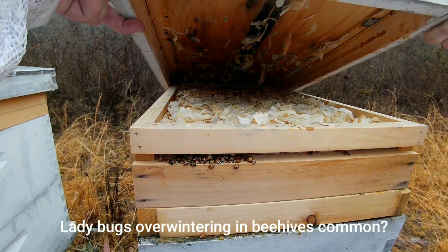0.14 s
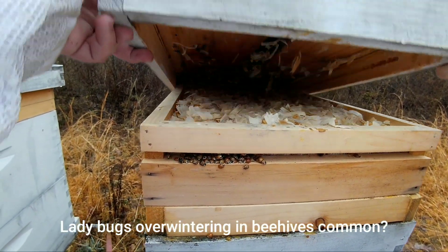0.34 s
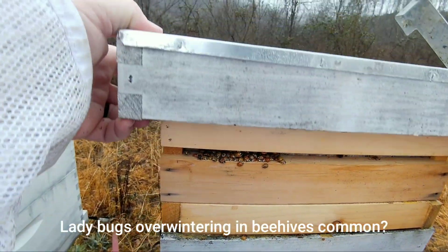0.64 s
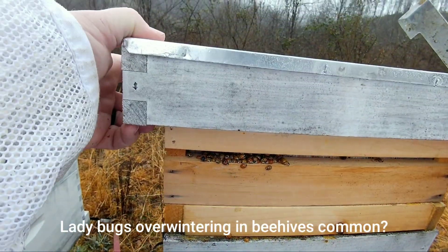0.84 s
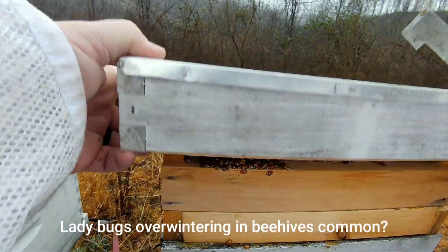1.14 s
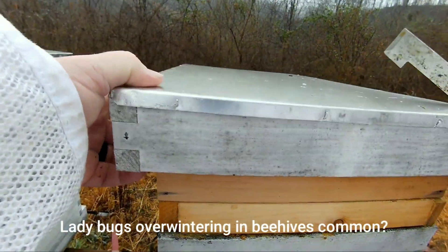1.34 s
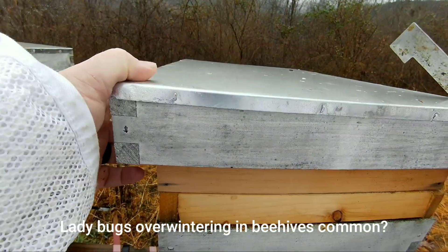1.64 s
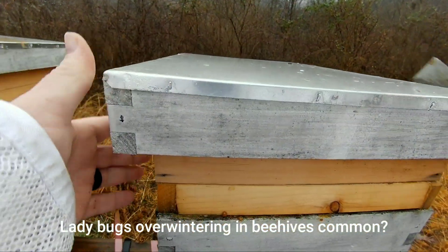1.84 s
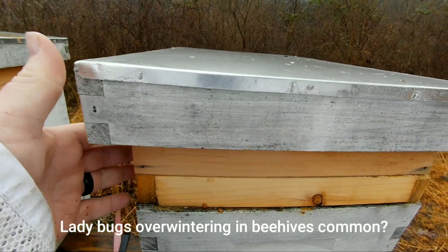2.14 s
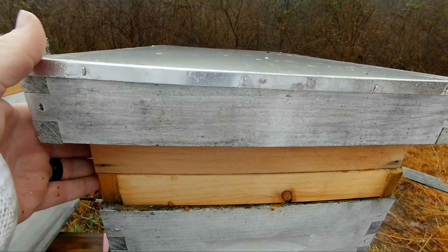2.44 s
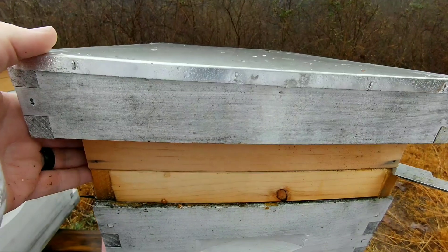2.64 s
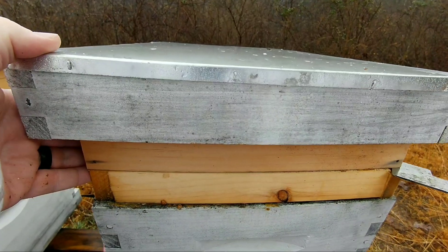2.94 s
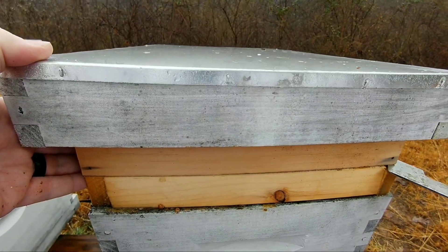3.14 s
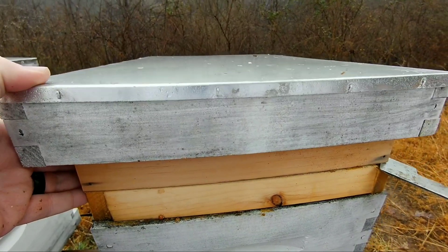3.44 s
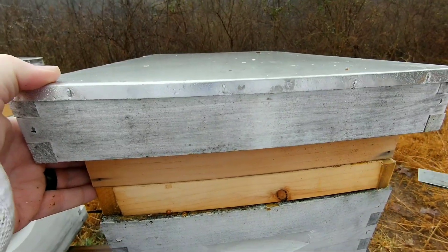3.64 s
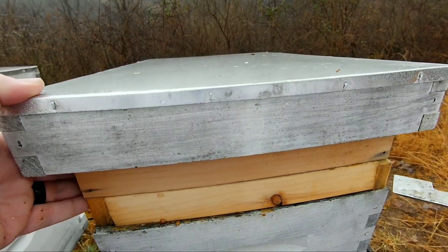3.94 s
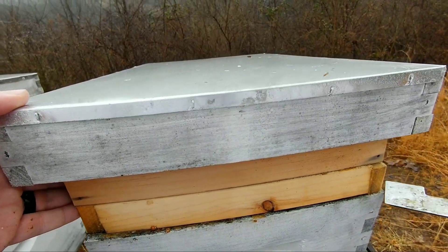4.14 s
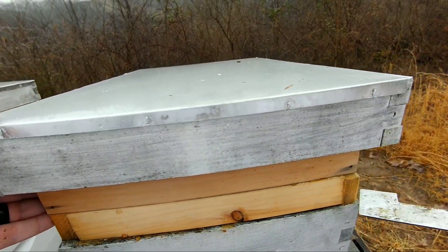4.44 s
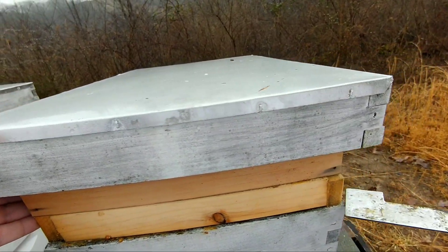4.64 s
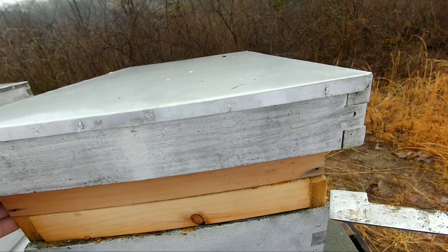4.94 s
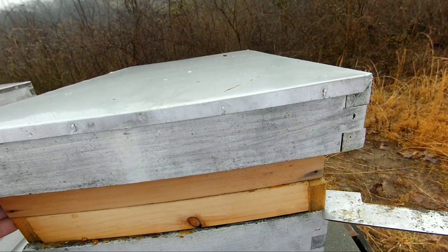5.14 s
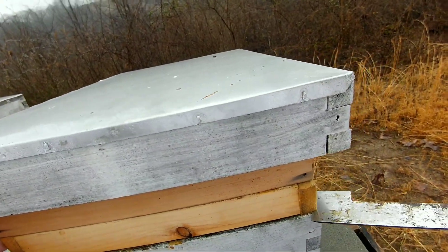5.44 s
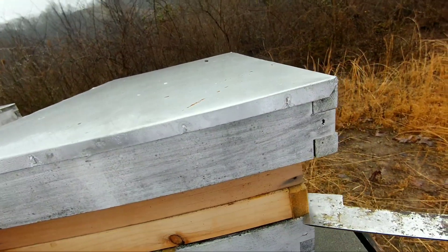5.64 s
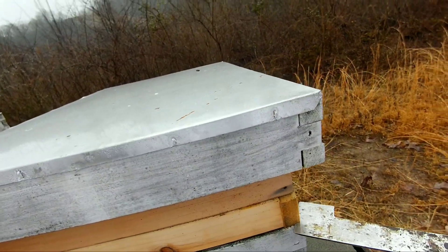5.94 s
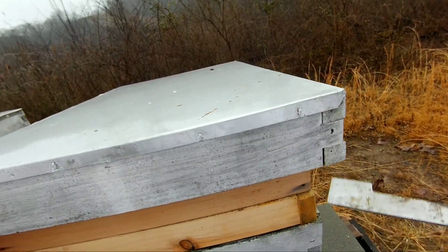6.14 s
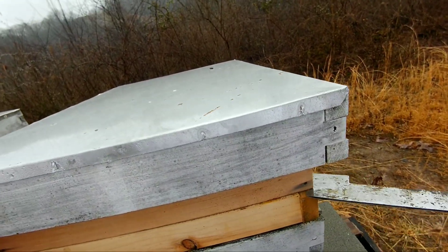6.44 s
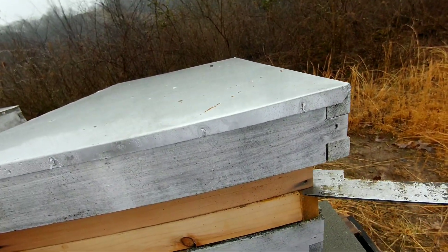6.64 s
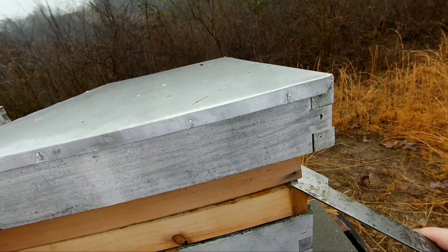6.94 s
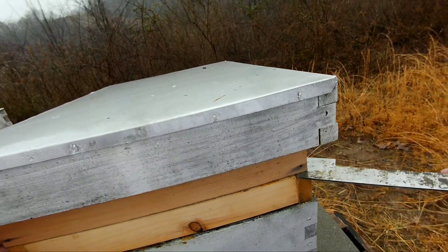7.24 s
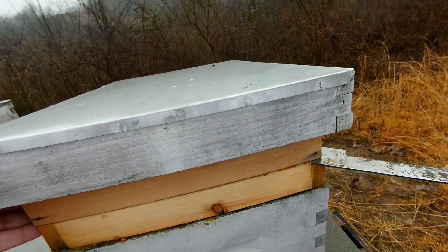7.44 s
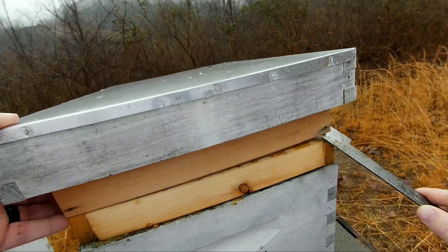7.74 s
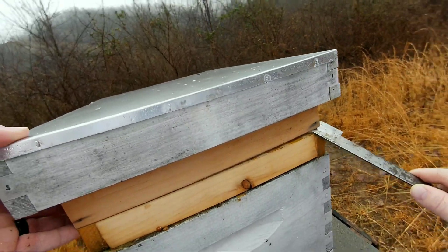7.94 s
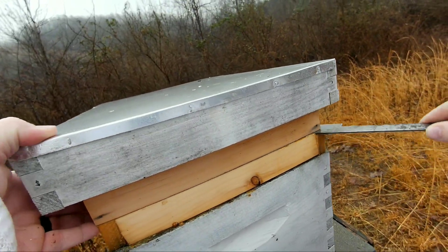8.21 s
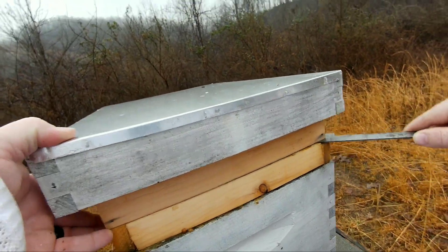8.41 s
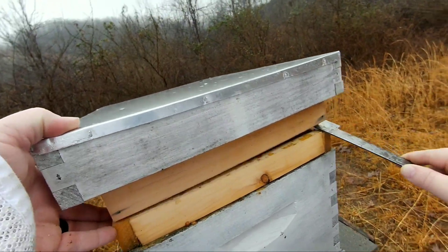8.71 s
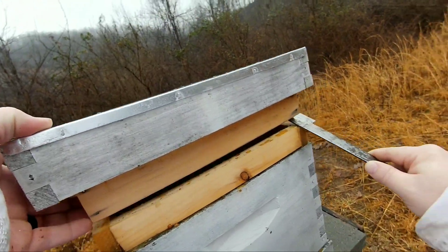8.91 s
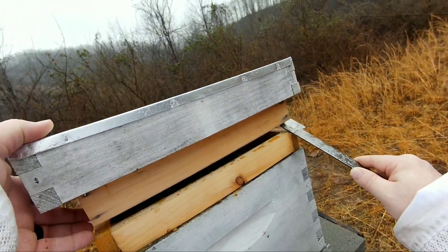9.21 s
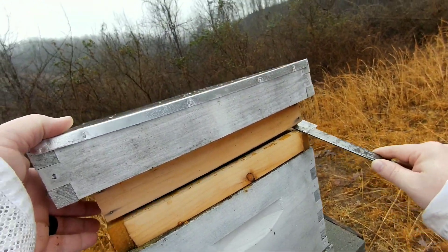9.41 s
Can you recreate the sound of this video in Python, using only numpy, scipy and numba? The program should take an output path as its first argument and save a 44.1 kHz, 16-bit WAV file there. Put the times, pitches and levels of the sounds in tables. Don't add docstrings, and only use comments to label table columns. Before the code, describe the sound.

A close outdoor scene over a quiet bed: a small engine putters low and unevenly far off, around 25 firings a second and slightly quicker after 5 s, with soft damp air and faint tyre roar swelling and fading. From 0 to 0.7 s come tiny gritty ticks and light wood rubbing. The lid settles with dull hollow knocks at 0.7-0.85 s, then a cluster of soft knocks and a tinny clack at 1.2-1.4 s, with fainter taps to 1.75 s. After a tick at 3.1 s, a very loud, clipped tin-and-wood bang strikes at 3.3 s, followed by a slam at 3.4 s, both short and dry. Faint taps occur near 5.1 and 5.9 s. A steel bar touches and bites with a bright clack at 7.0-7.1 s; wood rubs until 7.8 s. At 8.74 s the resin seal cracks sharply, followed by slight rubbing and a soft knock near 9 s. The engine continues to the end.

```python
import sys
import numpy as np
from scipy import signal
from scipy.io import wavfile
from scipy.ndimage import uniform_filter1d
from numba import njit

SR = 44100
rng = np.random.default_rng(int(sys.argv[2]) if len(sys.argv) > 2 else 0)


def bounce(signal):
    frames = np.transpose(np.atleast_2d(signal))
    limited = np.clip(frames, -1, 1)
    pcm = np.round(limited * 32767).astype(np.int16)
    wavfile.write(sys.argv[1], SR, pcm)


N = 422037


def undb(db):
    return 10 ** (np.asarray(db) / 20)


def level(x, db):
    return x * undb(db) / np.sqrt(np.mean(x ** 2))


def curve(rows):
    s, *columns = np.transpose(rows)
    return [np.interp(np.arange(N) / SR, s, c) for c in columns]


@njit
def svf(x, hz, width):
    y, b, l = np.empty(len(x)), 0., 0.
    for i in range(len(x)):
        g, k = np.tan(np.pi * hz[i] / SR), width / hz[i]
        v = (b + g * (x[i] - l)) / (1 + g * (g + k))
        b, l, y[i] = 2 * v - b, l + 2 * g * v, k * v
    return y


def band(x, hz, width):
    return svf(x, np.clip(hz * np.ones(len(x)), 10, .45 * SR), 1. * width)


def resonate(x, modes):
    return sum(undb(db) * band(band(x, hz, width), hz, 1.7 * width) for hz, width, db in modes)


def walk(rate):
    k = int(SR / rate)
    steps = np.repeat(rng.standard_normal(N // k + 1), k)
    return 0.71 * uniform_filter1d(uniform_filter1d(steps, k), k)[:N]


def add(out, s, x, db):
    i = int(s * SR)
    out[i:i + len(x)] += (x * undb(db) / np.abs(x).max())[:N - i]


def ring(modes, luck, stretch):
    t = np.arange(SR // 4) / SR
    hz, db, t60 = (c[:, None] for c in np.transpose(modes))
    a, b = luck[:len(modes), None], luck[::-1][:len(modes), None]
    decay = np.exp(-np.log(1000) * t / (t60 * stretch))
    tones = np.sin(2 * np.pi * hz * (1 + 0.03 * b) * t) * decay
    return np.sum(np.sign(b) * undb(db + 0.4 * a) * tones, axis=0)


# (frequency [Hz], level [dB], t60 [s])
BOX_MODES = [(80, -8, 0.087), (127, -4, 0.027), (186, -6, 0.07), (255, -2.5, 0.059), (332, -0.5, 0.05)]


def blows(table, panel, crack_modes, own_hz, t60, tail):
    out, t = np.zeros(N), np.arange(SR // 4) / SR
    fade = np.exp(-np.log(1000) * t / t60)
    snap = np.exp(-t / .0018) + tail * fade
    push = np.hanning(18)
    thud_modes = BOX_MODES + [(own_hz, 4, .09)] * (own_hz < 1000)
    crack_modes = crack_modes + [(own_hz, 700, 4)] * (own_hz > 1000)
    for s, panel_db, hz, thud_db, crack_db in table:
        s = s + 0.0012
        luck = rng.standard_normal(12)
        rattle_noise, crack_noise = rng.standard_normal((2, len(t)))
        board = ring(panel + [(hz, 2.5, .06)], luck, t60 / 0.062)
        rattle = resonate(rattle_noise * fade, [(hz, 600, 0), (1150, 500, -1), (560, 160, -3)])
        thud = ring(thud_modes, luck, 1.0)
        add(out, s, np.convolve(board, push), panel_db + 1.5)
        add(out, s, rattle, panel_db - 6.5)
        add(out, s, np.convolve(thud, np.hanning(130)), thud_db + 7)
        add(out, s, resonate(crack_noise * snap, crack_modes), crack_db + 7.0)
    return out


# (time [s], panel peak [dB], loudest panel pitch [Hz], box thud [dB], crack [dB])
CLACKS = [
    (1.319, -20.5, 1028, -59, -36),
    (1.325, -23.5, 520, -48, -50),
    (3.305, -1.5, 647, -19, -13),
    (3.323, -25, 533, -30, -37.5),
]
# (frequency [Hz], level [dB], t60 [s])
LID_MODES = [(490, -6.5, 0.055), (681, 0.5, 0.065), (900, -5.5, 0.05), (1107, -16.5, 0.091),
             (1184.3, -7, 0.047), (1370, -9, 0.041), (1599, -23.5, 0.054), (2020, -16, 0.022),
             (2420, -29.5, 0.03)]
# (frequency [Hz], width [Hz], level [dB])
TIN_CRACK = [(2900, 1800, -2), (4600, 1300, 2.5), (6505, 4400, -9)]


def lid_clacks():
    return blows(CLACKS, LID_MODES, TIN_CRACK, own_hz=3300, t60=.034, tail=.1)


# (time [s], peak [dB])
SLAPS = [
    (3.307, 2.5),
    (3.3241, -33.5),
]


def tin_slap():
    out, t = np.zeros(N), np.arange(SR // 100) / SR
    for s, db in SLAPS:
        hiss = resonate(rng.standard_normal(len(t)), [(9300, 1000, 0.0), (11600, 9000, 0.0084)])
        shriek = np.sin(2 * np.pi * 10340 * t) + hiss
        add(out, s, shriek * np.exp(-((t - .001) / 0.0005) ** 2), db)
    return out


# (time [s], panel peak [dB], loudest panel pitch [Hz], box thud [dB], crack [dB])
SLAMS = [
    (0.779, -37.5, 443, -39, -44),
    (0.799, -33, 750, -25, -52),
    (3.39, -6, 676, -18.5, -23.5),
    (3.407, -28, 506, -55, -29.5),
]
# (time [s], panel peak [dB], loudest panel pitch [Hz], box thud [dB])
KNOCKS = [(0.689, -44, 440, -53.5), (0.842, -40, 1090, -38.5), (1.18, -28.5, 687, -59),
          (1.194, -44, 670, -41), (1.238, -27.5, 514, -33.5), (1.246, -39, 500, -27.5),
          (1.356, -40, 533, -44), (1.394, -45, 616, -58.5), (1.563, -39.5, 1300, -55.5),
          (1.7174, -39.5, 900, -53.5), (1.736, -34, 486, -45.5), (5.049, -46, 1290, -54.5),
          (5.197, -45, 647, -56), (5.93, -52, 810, -58), (7.468, -43.5, 1160, -52.5),
          (7.6, -57, 450, -55.5), (8.949, -42.5, 477, -44)]
# (frequency [Hz], level [dB], t60 [s])
BOARD_MODES = [(523, -4.5, 0.061), (886, -1.5, 0.052), (1127, -4.5, 0.042), (1450, -30, 0.025)]
# (frequency [Hz], width [Hz], level [dB])
WOOD_CRACK = [(2048, 1200, -9.5), (3700, 760, 1), (4710, 410, -2)]


def wood_knocks():
    soft = [tuple(row) + (row[1] - 29,) for row in KNOCKS]
    return blows(soft + list(SLAMS), BOARD_MODES, WOOD_CRACK, own_hz=219.8, t60=0.049, tail=0.16)


# (time [s], panel peak [dB], pitch added to the frame modes [Hz], box thud [dB], crack
# [dB])
PRIES = [
    (7.011, -33.5, 925, -42.5, -51),
    (7.029, -38, 810, -39.5, -43),
    (7.093, -17, 1130, -32, -21.5),
]
# (time [s], panel peak [dB], pitch added to the frame modes [Hz], box thud
# [dB], crack [dB])
TEARS = [
    (8.738, -24, 893.5, -36, -33.5),
    (8.743, -20, 547, -31.5, -28.5),
]
# (frequency [Hz], level [dB], t60 [s])
FRAME_MODES = [(334, -9, 0.23), (520, -7, 0.047), (745, 6.5, 0.068), (900, 10, 0.042), (1143, 12, 0.019),
               (1686, 10, .03), (2130, -14.5, .03), (2900, 9, 0.0063)]
# (frequency [Hz], width [Hz], level [dB])
RESIN_CRACK = [(4220, 790, -5), (1800, 660, -2), (8800, 1240, -11.5)]


def steel_bar():
    pries = blows(PRIES, FRAME_MODES, TIN_CRACK, own_hz=2900, t60=0.036, tail=0.99)
    return pries + blows(TEARS, FRAME_MODES[:-1], RESIN_CRACK, own_hz=3800, t60=0.043, tail=0.32)


# (time [s], peak [dB], pitch [Hz])
TICKS = [(0.1145, -52, 3190), (0.13, -58, 2480), (0.3546, -51.5, 2530), (0.388, -58, 2640),
         (0.416, -55.5, 2280), (0.4817, -51.5, 2480), (0.581, -56, 2350), (0.608, -44.5, 3550),
         (0.641, -57, 2900), (0.7532, -38.5, 3700), (3.0696, -36, 4300), (3.1728, -53, 4830),
         (6.9786, -39.5, 4300), (7.0019, -43, 5290), (7.7104, -67, 2420), (7.742, -46, 3580),
         (7.7805, -53.5, 2570), (8.6906, -37, 4280), (8.996, -47, 3480)]


def ticks():
    out, t = np.zeros(N), np.arange(SR // 20) / SR
    for s, db, hz in TICKS:
        puff = rng.standard_normal(len(t)) * np.exp(-t / .0028)
        body = resonate(puff, [(hz, 0.28 * hz, 0), (1700, 1400, -1), (800, 600, -4), (2800, 3000, -4)])
        sizzle_db = -14.5 + 11 * max(hz - 3800, 0) / 1000
        add(out, s, body, db + 2.0)
        add(out, s, resonate(puff, [(6770, 6700, 0)]), db + sizzle_db)
    return out


# (start [s], end [s], level [dB], centre [Hz], width [Hz])
RUB = [(0.071, 0.246, -65, 2820, 900), (0.51, 0.803, -68, 2600, 1200), (0.69, 0.79, -59, 900, 900),
       (1.142, 1.282, -50, 1003, 805), (1.693, 1.757, -58, 600, 500), (6.996, 7.078, -60, 900, 900),
       (7.33, 7.577, -59.5, 1180, 500), (7.54, 7.647, -65, 1500, 500), (7.683, 7.839, -56, 1460, 590),
       (7.725, 7.826, -66.5, 3700, 2470), (8.337, 8.526, -71.5, 4250, 1200), (8.868, 9.04, -64, 1272, 821)]


def rubbing():
    out = np.zeros(N)
    grain_db = 2.5 * rng.exponential(size=N) + 2.5 * walk(90)
    grains = level(rng.standard_normal(N) * undb(grain_db), 0)
    for start, end, db, hz, width in RUB:
        i, k = int(start * SR), int(end * SR)
        scrape = level(resonate(grains[i:k], [(hz, width, 0)]), db)
        out[i:k] += np.hanning(k - i) ** 0.5 * scrape
    return out


def yard_echo(near):
    t = np.arange(SR // 5) / SR
    yard = band(rng.standard_normal(len(t)), 400, 700) * np.exp(-np.log(1000) * t / 0.071) * (t > .006)
    return signal.fftconvolve(near, yard / np.sqrt(np.sum(yard ** 2)))[:N]


def pipe(pulses, tuning, modes, sign=1, wide=3.0):
    out = 0
    for k, (hz, width, db) in enumerate(modes):
        tone = band(band(pulses, hz * tuning, width), hz * tuning, wide * width)
        out = out + sign ** k * undb(db) * level(tone, 0)
    return out


# (time [s], firing rate [Hz], exhaust bark [dB], load [dB])
ENGINE = [(0, 23.2, -43.5, 3), (.32, 23.52, -44, -1), (.98, 25.16, -44.5, 1.5), (1.28, 26.92, -43, 0.5),
          (1.76, 26.5, -44, 1.5), (2.11, 26.69, -44.5, 4), (2.25, 26.57, -46.5, 5.5),
          (2.5, 26.31, -48, 2.5), (3.17, 26.33, -42.5, 0), (3.62, 26.36, -43, -2), (4.3, 26.54, -41.5, -1),
          (5.6, 28.64, -45, -2.5), (6.05, 29.84, -43, -2.5), (6.7, 29.45, -44.5, -2),
          (7.68, 28.6, -45.5, -3), (8.13, 28.78, -43, -2), (8.75, 28.81, -45, -0.5),
          (9.57, 26.78, -43.5, -2)]
# (frequency [Hz], width [Hz], level [dB])
BOOM = [(27.7, 13, -5), (53.4, 20, 2.5), (76, 81, -4), (105.5, 5.2, -10.5)]
# (frequency [Hz], width [Hz], level [dB])
BARK = [(152.4, 27, 3), (178, 51, -13)]
# (frequency [Hz], width [Hz], level [dB])
RASP = [(244, 43, 8), (390, 120, -3)]


def engine():
    hz, bark_db, load_db = curve(ENGINE)
    faster = hz - 26.5
    tuning = 0.92 + 0.016 * faster
    unsteady = 1 + 0.0023 * walk(24) + .005 * walk(5)
    turns = np.cumsum(hz * unsteady) / SR + .25
    fired = np.flatnonzero(np.diff(np.floor(turns)))
    pulses = np.zeros(N)
    pulses[fired] = undb(.8 * rng.standard_normal(len(fired)))
    pulses = signal.fftconvolve(pulses, np.hanning(70), "same")
    gas = resonate(np.exp(-(turns % 1) / 0.46) * rng.standard_normal(N), [(340, 400, 0)])
    bark = undb(bark_db + .7 * walk(6.8)) * level(pipe(pulses, tuning, BARK, wide=5.9), 0)
    boom_db = -49 + 0.18 * faster
    boom = undb(boom_db) * level(pipe(pulses, tuning, BOOM, sign=-1.1), 0)
    rasp_db = -45.5 + load_db + 0.5 * walk(2.5)
    rasp = undb(rasp_db) * (level(pipe(pulses, tuning, RASP), -12.0) + level(gas, -19.5))
    return boom - bark - rasp


# (frequency [Hz], density [dB per Hz])
AIR = [(320, -5.5), (450, -4), (600, -10), (919, -8.5), (1310, -18), (2730, -25), (7970, -31.5),
       (15500, -48)]


def air(hush):
    out, swell, table = 0, walk(0.51), np.array(AIR)
    for hz in 320 * 2 ** np.arange(0, 5.7, 1 / 3):
        db = np.interp(np.log(hz), np.log(table[:, 0]), table[:, 1]) + .5 * swell + .8 * walk(12)
        db = db - 1.5 * hush * min(hz / 2500, 1) * np.clip(1 + .6 * walk(25), .2, 3)
        out = out + undb(db) * band(band(rng.standard_normal(N), hz, hz / 3), hz, hz / 2)
    rumble = undb(1.6 * walk(0.6)) * resonate(rng.standard_normal(N), [(68.4, 98, 0.0), (197, 200, -4.5)])
    return level(out, -61) + level(rumble, -58)


# (nearest time [s], level [dB], distance / speed [s])
ROAD = [
    (1.0, -58.5, .3),
    (2.25, -61, .25),
    (5.8, -61.5, .9),
    (7.2, -58, .7),
    (9.1, -57.5, .4),
]


def road():
    t = np.arange(N) / SR
    power = sum(undb(2 * db) / (1 + ((t - s) / wide) ** 2) ** 2 for s, db, wide in ROAD)
    return level(band(band(rng.standard_normal(N), 930, 260), 810, 350), -2.5) * np.sqrt(power)


def hush_after_blows(near):
    keep = np.exp(-1 / (.05 * SR))
    memory = signal.lfilter([1 - keep], [1, -keep], near ** 2)
    return memory / (memory + undb(-104))


def thin_treble(x):
    thin_from_hz = 3000
    hz, _, z = signal.stft(x, SR, "cosine", nperseg=2048)
    near = uniform_filter1d(np.abs(z), size=9, axis=0)
    power = np.sum(near[hz > 500] ** 2, axis=0)
    memory = signal.lfilter([1], [1, -.68], power)
    starved = memory / (memory + 20 * np.median(power))
    sieve = np.clip(hz[:, None] / thin_from_hz - 1 + starved, 0, 1) * (.92 + .25 * starved)
    patches = np.kron(rng.standard_normal((len(hz) // 16 + 1, len(power) // 4 + 1)), np.ones((16, 4)))
    sieve *= 1 + .25 * starved * patches[:len(hz), :len(power)]
    sieve[(hz > 9750) & (hz < 10280)] = 2 * (starved < .9)
    lasting = uniform_filter1d(np.abs(z) / near, size=5, axis=1)
    survives = lasting > sieve * (hz[:, None] > thin_from_hz / 2)
    z = z * (survives | (near > undb(-81)))
    z = z + undb(-27) * near * np.exp(2j * np.pi * rng.random(z.shape))
    return signal.istft(z * (hz[:, None] < 15300), SR, "cosine", nperseg=2048)[1][:N]


def scene():
    near = lid_clacks() + wood_knocks() + steel_bar() + ticks() + rubbing()
    cover = signal.butter(4, [55, 9500], "bandpass", fs=SR, output="sos")
    near = signal.sosfilt(cover, near) + tin_slap()
    background = engine() + air(hush_after_blows(near)) + road()
    return (near + undb(-24.0) * yard_echo(near) + background)[None]


def top_cut(x):
    return signal.sosfilt(signal.butter(12, 16500, fs=SR, output="sos"), x)


def record(dry):
    mix = thin_treble(np.clip(dry[0], -.9, .9))[None]
    return top_cut(mix)


dry = scene()
out = record(dry)
bounce(out)
```